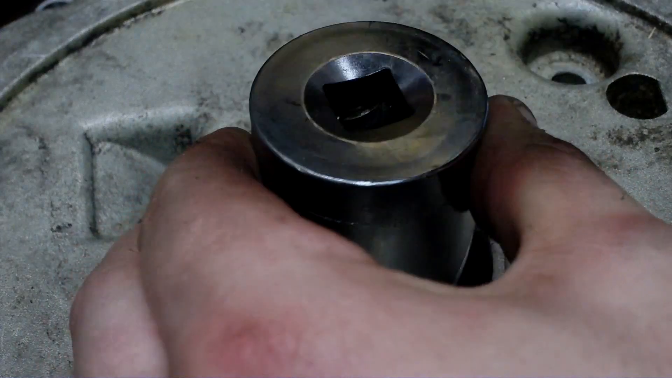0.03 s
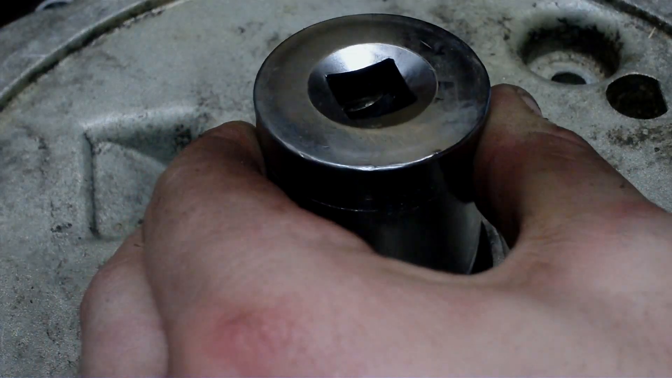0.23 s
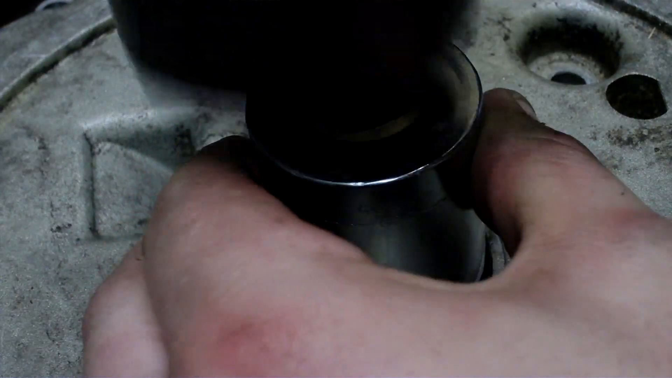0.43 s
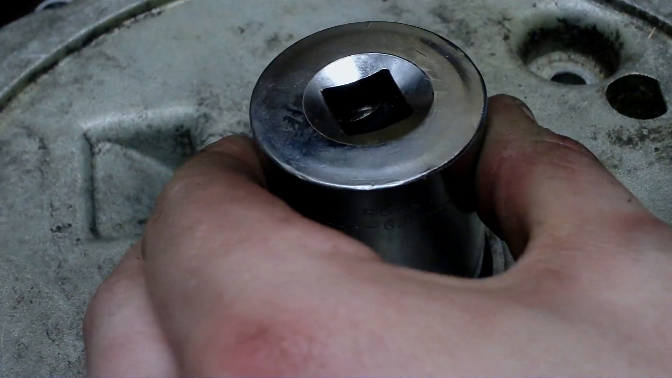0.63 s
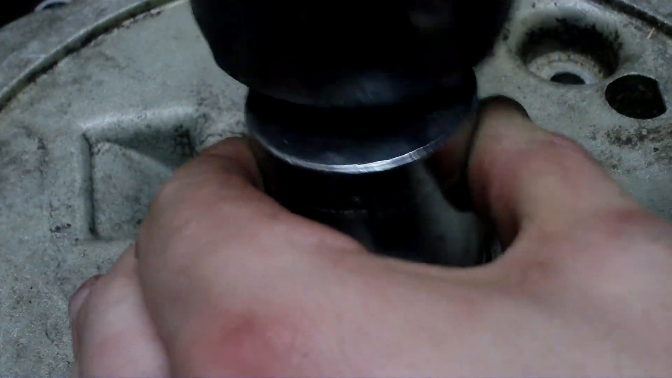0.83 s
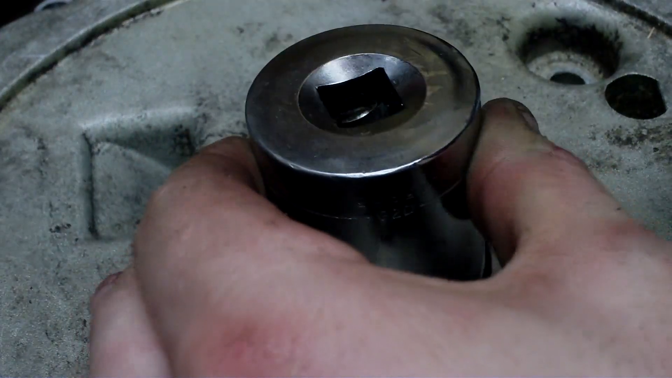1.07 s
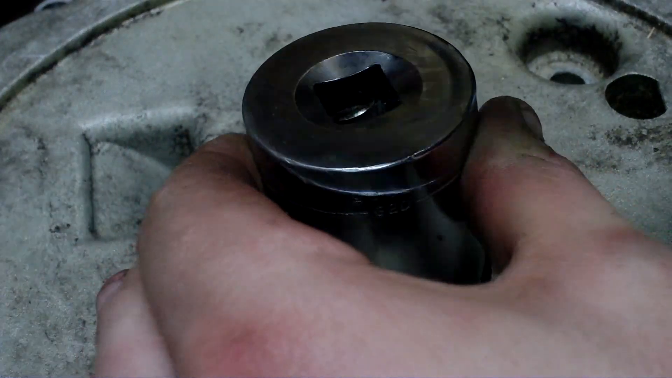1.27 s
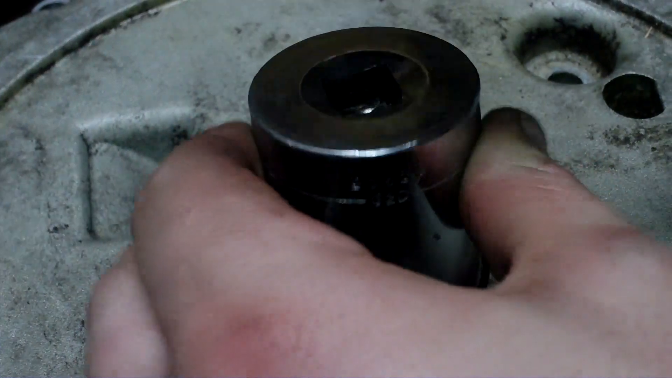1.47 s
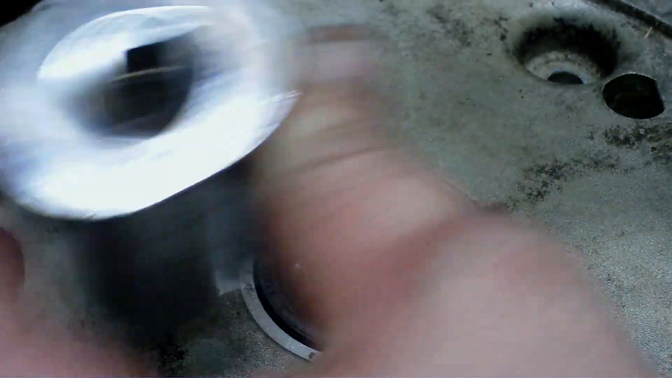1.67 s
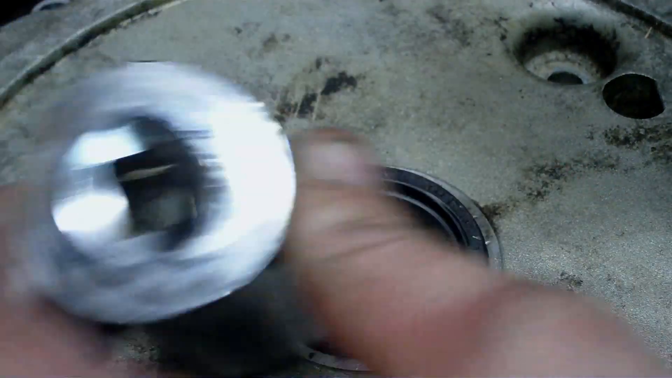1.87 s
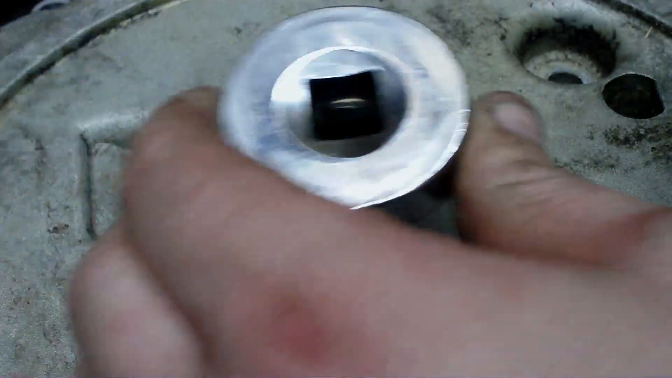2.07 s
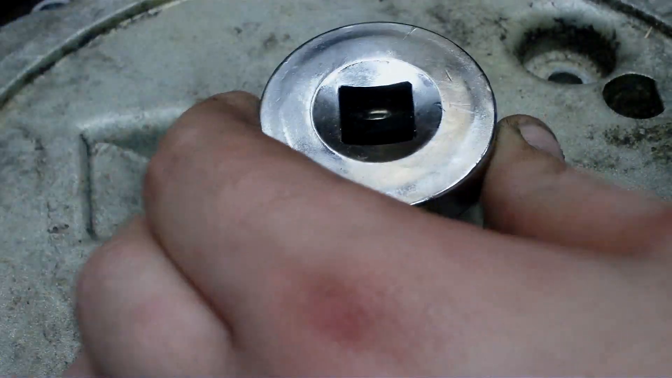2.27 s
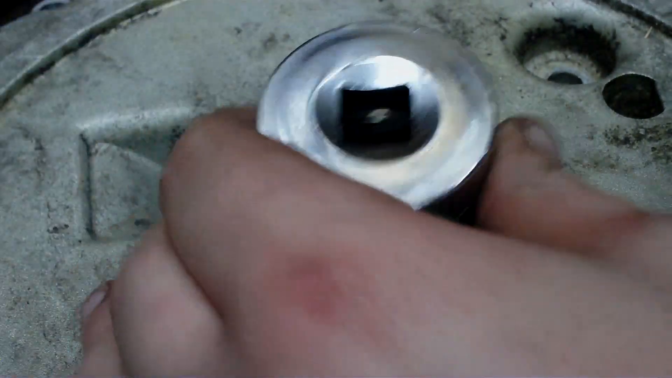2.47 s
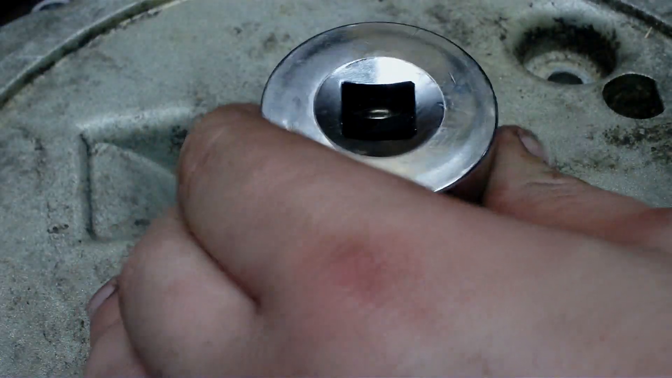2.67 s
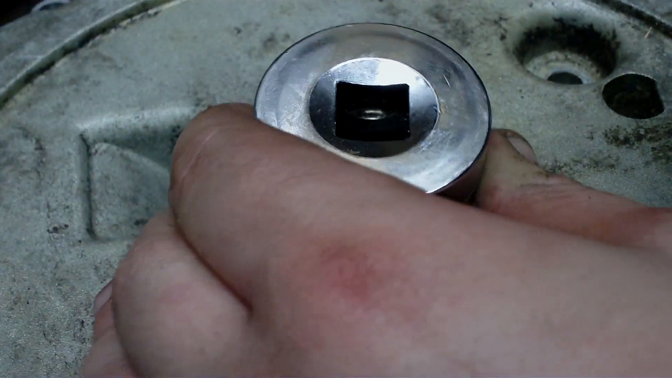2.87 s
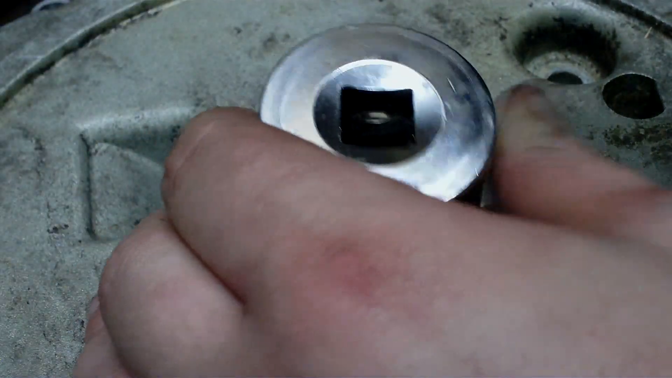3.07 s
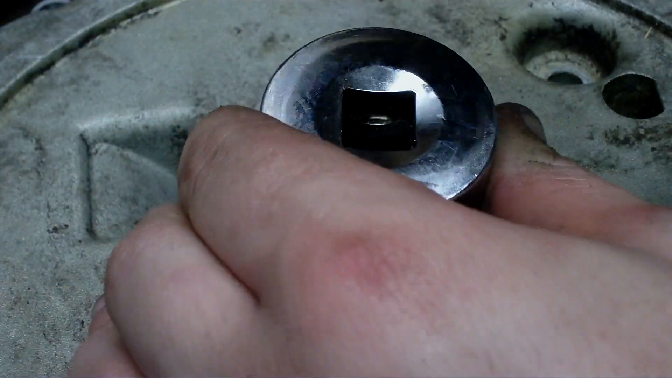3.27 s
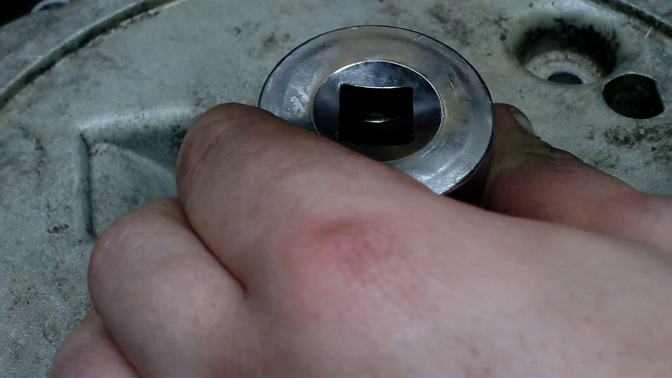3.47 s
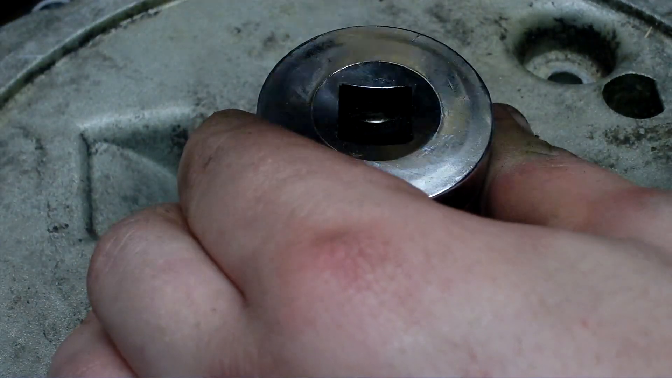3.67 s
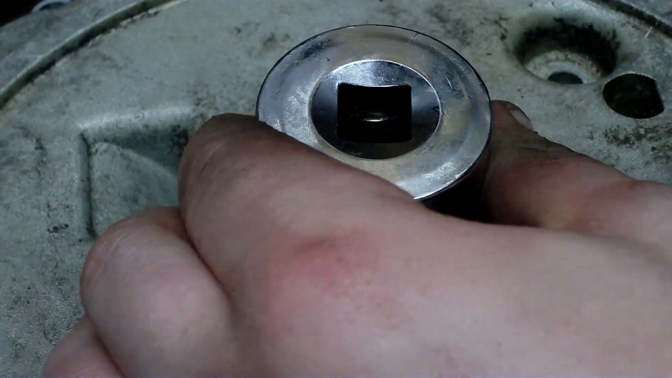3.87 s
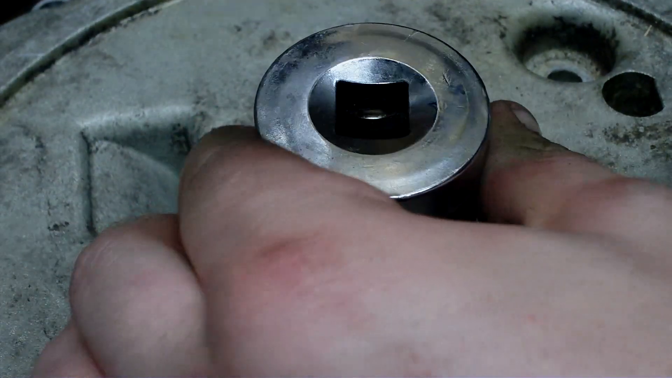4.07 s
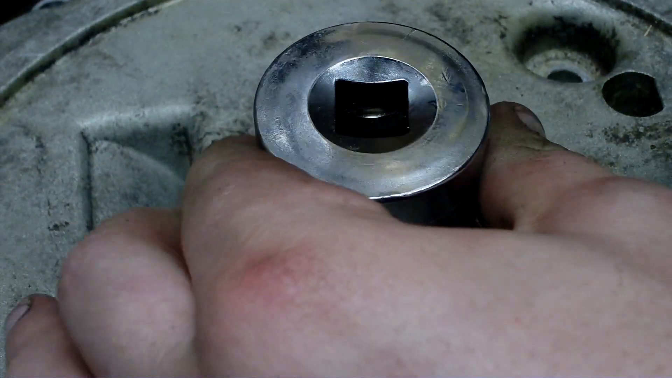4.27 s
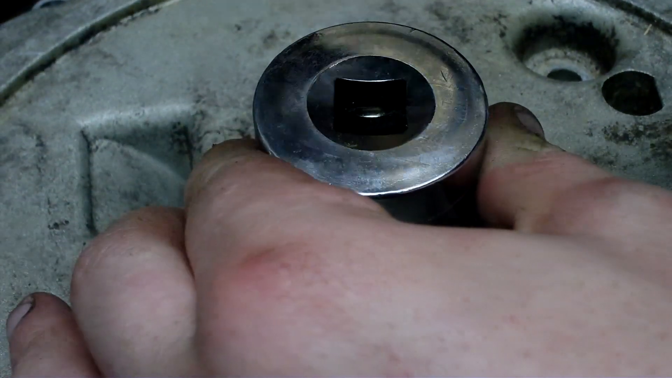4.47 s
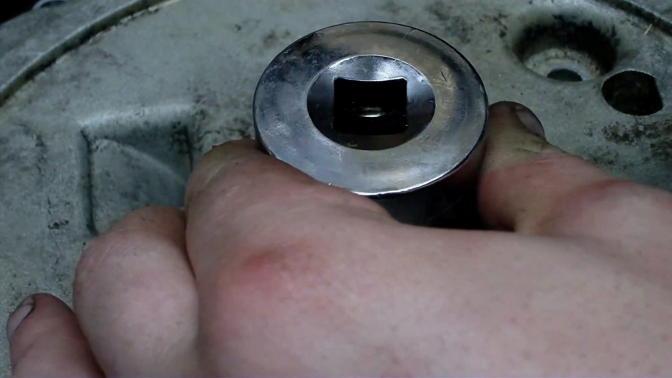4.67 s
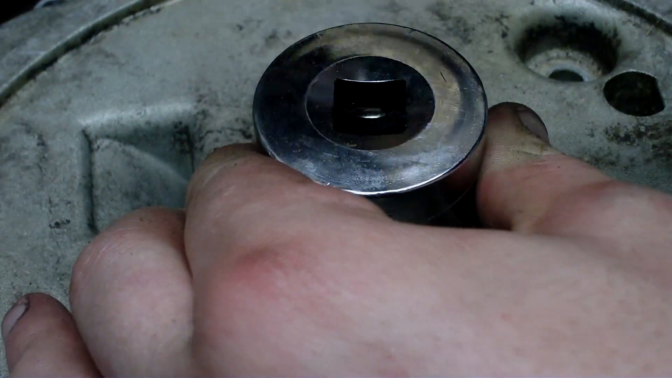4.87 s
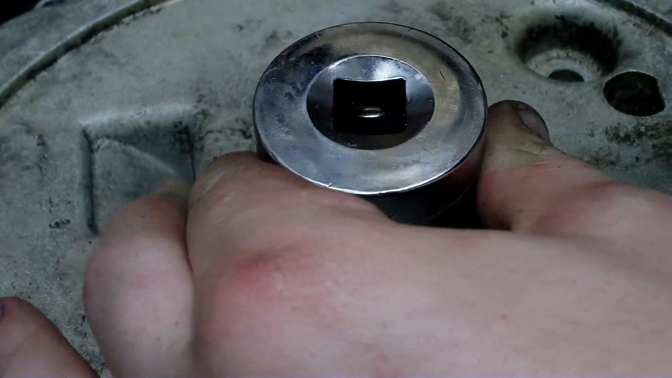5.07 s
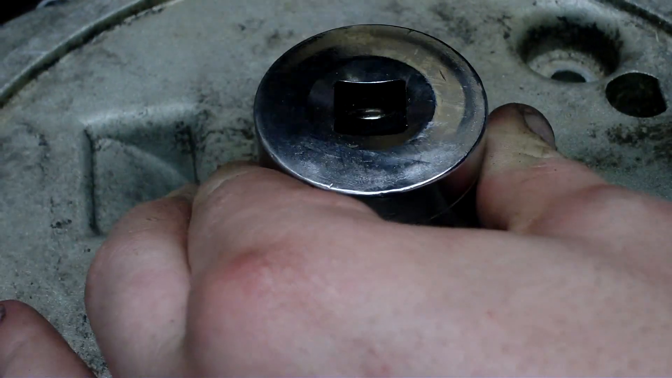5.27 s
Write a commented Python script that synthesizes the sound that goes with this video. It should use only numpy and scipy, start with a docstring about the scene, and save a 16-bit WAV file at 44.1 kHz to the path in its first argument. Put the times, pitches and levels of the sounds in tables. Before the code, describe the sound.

A rubber mallet drives a seal into a cast metal engine housing through a hand-held steel socket, heard close in a garage. A weaker blow is already sounding at 0 s, another lands at 0.47, then fuller ones at 0.96 and 1.46. Each is a blunt, hard crack with an almost immediate bounce, a short low thump, a dense midrange clang and a thinner, shimmering steel ring, fading within about 0.4 s. From 1.8 to 2.4 s skin rubs softly on the socket; a cushioned knock with a slight click falls at 2.3, a fainter touch at 2.9. Barely audible rising whistles chirp between 1.8 and 3.5. A light scuff at 3.66 leads to a moderate blow at 3.72, then heavy ones at 4.08, 4.49, 4.89 and a bright, thumpy one at 5.28, cut short. Peaks are compressed and overloaded, extreme treble missing; faint steady air lies beneath.

```python
"""A rubber mallet drives a seal into a cast engine housing through a hand-held steel socket, in a garage.
Each blow is a noise crack with a rebound, a low thump, decaying housing modes, beating socket modes and a wash.
Between blows come soft touches and a slide of skin on the socket (filtered noise), and faint rising sine chirps.
Quiet band-shaped air noise lies beneath. The sound is nearly mono below the treble;
a limiter and a rounded overload hold down the loud peaks, and a steep filter removes the very top."""
import sys
import numpy as np
from scipy import signal
from scipy.io import wavfile

SR = 44100
rng = np.random.default_rng(int(sys.argv[2]) if len(sys.argv) > 2 else 0)


def generate_wav(sig):
    """Save sig (samples, or channels by samples) to the path in sys.argv[1] as 16-bit PCM at SR."""
    pcm = np.round(np.clip(np.atleast_2d(sig).T, -1, 1) * 32767).astype(np.int16)
    wavfile.write(sys.argv[1], SR, pcm)


N = 234170

AGE = np.arange(SR * 4 // 5) / SR   # time since a contact [s]
EDGES = 22 * 2 ** (np.arange(28) / 3)   # third-octave band edges [Hz]
CENTRES = np.sqrt(EDGES[1:] * EDGES[:-1])


def from_db(db):
    """Decibels to gain."""
    return 10 ** (np.asarray(db) / 20)


def rms_one(x):
    """Scale to unit rms."""
    return x / np.sqrt(np.mean(x ** 2) + 1e-20)


def at_hz(points, hz):
    """Read a table on a log-frequency axis."""
    points = np.array(points)
    return np.interp(np.log(hz), np.log(points[:, 0]), points[:, 1])


def butter(x, hz, kind, order=2):
    """Causal Butterworth filter."""
    return signal.sosfilt(signal.butter(order, hz, kind, fs=SR, output="sos"), x)


def dying(t60):
    """Envelope that falls by 60 dB in t60 seconds."""
    return np.exp(-np.log(1000) * AGE / t60)


def add(out, s, sound):
    """Mix a sound in at time s, trimmed to the scene."""
    start = round(s * SR)
    first = max(start, 0)
    last = min(start + sound.shape[-1], N)
    out[:, first:last] += sound[..., first - start:last - start]


# stereo width of noise and socket ring: (frequency [Hz], side level relative to mid [dB])
STEREO_WIDTH = [(100, -53.5), (400, -53.5), (1000, -52), (2500, -41), (4500, -22), (7000, -5.5),
                (11000, 1.5)]


def noise_bands(spectrum, size):
    """Third-octave stereo noise (bands, 2, size), shaped to about unit mid power, wider in the treble."""
    gains = from_db(at_hz(spectrum, CENTRES))
    total_power = np.sum(gains ** 2 * np.diff(EDGES)) / (SR / 2)
    gains = gains / np.sqrt(total_power)
    white = rng.standard_normal((2, 2, size))
    bands = np.empty((len(CENTRES), 2, size))
    for k, hz in enumerate(CENTRES):
        # neighbouring bands draw on different noise
        mid, side = gains[k] * butter(white[k % 2], EDGES[k:k + 2], "band")
        bands[k] = mid + from_db(at_hz(STEREO_WIDTH, hz)) * side * [[1], [-1]]
    return bands


# decay of the dense ringing: (frequency [Hz], t60 [s])
WASH_DECAY = [(50, 0.13), (130, 0.37), (300, 0.4), (1000, 0.38), (1700, 0.38), (3000, 0.21), (6000, .29),
              (11000, .25)]
# a more firmly seated socket makes the housing's midrange ring more;
# bass and rebound grow less, the crack hardly at all
# each pair: level at housing ring 0 [dB], growth [dB per dB of housing ring]
CRACK_DB, CRACK_GROWTH = 1, 0.027
BASS_DB, BASS_GROWTH = -0.5, 0.33
REBOUND_DB, REBOUND_GROWTH = 0, 0.91
REBOUND_S = 0.021   # the socket hops and lands again
CRACK_LOW_HZ, CRACK_HIGH_HZ = 330, 7500   # the crack has no deep bass, and rubber softens its very top


def wash(bands, housing_ring_db, bright_db, crack_t60, build_s, contact_s):
    """Countless modes and reflections: a crack, a second as the socket lands, a tail that dies band by band."""
    out = np.zeros((2, len(AGE)))
    swell = 1 - np.exp(-AGE / build_s)
    contact = dying(crack_t60) * (1 - np.exp(-AGE / contact_s))
    landing = np.interp(AGE - REBOUND_S, AGE, contact)
    rebound = from_db(REBOUND_DB + REBOUND_GROWTH * housing_ring_db) * landing
    crack = np.hypot(from_db(CRACK_DB + CRACK_GROWTH * housing_ring_db) * contact, rebound)
    bass_lift_db = BASS_DB + BASS_GROWTH * housing_ring_db - housing_ring_db
    for hz, band in zip(CENTRES, bands):
        high = hz ** 2 / (hz ** 2 + 2200 ** 2)   # share of the brightness
        low = 1 / (1 + (hz / 450) ** 2)   # share of the bass lift
        tilt = from_db(bright_db * high + bass_lift_db * low)
        crack_colour = 1 / np.hypot(1, (CRACK_LOW_HZ / hz) ** 2) / np.hypot(1, hz / CRACK_HIGH_HZ)
        tail = from_db(housing_ring_db) * swell * dying(at_hz(WASH_DECAY, hz))
        out += tilt * np.hypot(crack_colour * crack, tail) * band
    return out


def struck(modes, scatter_db=0):
    """Decaying modes: each strike gives them random polarity and, with scatter, shares its energy anew."""
    out = np.zeros(len(AGE))
    for hz, db, t60 in modes:
        level_db = db + abs(scatter_db) * rng.standard_normal()
        strength = from_db(level_db) * rng.choice([-1, 1])
        out += strength * dying(t60) * np.sin(2 * np.pi * hz * AGE)
    return butter(out, 140, "high")   # small bodies radiate no deep bass


def shimmering(modes, flutter_hz, build_s, steady):
    """High modes arrive by many paths: they swell, then beat at random, differently on each side."""
    out = np.zeros((2, len(AGE)))
    for hz, db, t60 in modes:
        paths = rms_one(butter(rng.standard_normal((4, len(AGE))), flutter_hz, "low"))
        sine = np.sin(2 * np.pi * hz * AGE)
        cosine = np.cos(2 * np.pi * hz * AGE)
        mid = (steady + paths[0]) * sine + paths[1] * cosine
        side = from_db(at_hz(STEREO_WIDTH, hz)) * (paths[2] * sine + paths[3] * cosine)
        out += from_db(db) * dying(t60) * (mid + side * [[1], [-1]])
    return out * (1 - np.exp(-AGE / build_s))


def thump(hz, t60):
    """The rubber head shoves the whole housing away: a heavily damped low swing."""
    swing = np.sin(2 * np.pi * hz * AGE) * dying(t60)
    return -butter(swing, 30, "high", order=1)


# mallet blows: (time [s], housing ring [dB], brightness [dB], thump relative to housing ring [dB],
# freedom of the socket to ring, relative to housing ring [dB])
MALLET_BLOWS = [(-0.028, -12.5, -5.5, -17, -6), (0.4746, -10.5, 3.5, -10, -5.5),
                (0.962, -2, 3.5, -15.5, -0.5), (1.4552, -1, 3.5, -17.5, 4), (3.7170, -9, 2, -15.5, 0),
                (4.0775, 1, 1.5, 1.5, -3.5), (4.4890, 2, 4, -6, -4.5), (4.8880, 4.5, 3.5, -2, -7),
                (5.284, -2.5, 7, 6.5, 1)]
# strongest resonances of the cast housing: (frequency [Hz], relative level [dB], t60 [s])
HOUSING_MODES = [(170, -11, .36), (238, -8, .38), (291, -7, .33), (338, -2, .3), (373, -4, .28),
                 (396, 2, .33), (554, -7, .25), (658, -7, .28), (772, -1, .28), (822, -2, .26),
                 (839, 1, .3), (1093, -3, .28), (1140, -3, .26), (1227, -3, .28), (1287, -5, .28),
                 (1335, -3, .28), (1457, -3, .25), (1710, -7, .22), (1950, -10, .2), (2129, -12, .2),
                 (2572, -11, .2), (2867, -15, .2), (3200, -17, .15)]
# steel socket, damped by the hand: (frequency [Hz], relative level [dB], t60 [s])
SOCKET_MODES = [(4813, 1, .31), (6223, 0, .28), (6934, -15, .75), (7214, 1, .28), (7957, -1, .32),
                (7989, -1, .32), (9135, 6, .26), (9545, -2, .3), (10510, 2, .29)]
# dense ringing of housing and garage: (frequency [Hz], relative level per Hz [dB])
WASH_SPECTRUM = [(40, -22.5), (120, -16), (210, -14), (320, 0.5), (600, 0.5), (850, 2.5), (1400, -2),
                 (2000, -10), (2300, -13), (3000, -16.5), (5000, -26), (8000, -33.5), (11000, -45.5)]
LONG_RING_HZ, LONG_RING_T60 = 1082, 0.72   # [Hz], [s]: a lingering mode, louder when the grip is loose


def mallet(wash_db, housing_db, socket_db, long_db, thump_db, alike):
    """Every blow excites the same bodies, in shares set by how firmly the socket sits and how tight the grip is."""
    out = np.zeros((2, N))
    lasting = noise_bands(WASH_SPECTRUM, len(AGE))
    alike = np.clip(alike, 0, 1)
    for s, housing_ring_db, bright_db, shove_db, freedom_db in MALLET_BLOWS:
        # part of the room's answer repeats; the hand and the point of contact shift the rest
        fresh = noise_bands(WASH_SPECTRUM, len(AGE))
        bands = np.sqrt(alike) * lasting + np.sqrt(1 - alike) * fresh
        dense = wash(bands, housing_ring_db, bright_db, crack_t60=0.13, build_s=0.0055, contact_s=0.00088)
        housing = from_db(housing_db) * struck(HOUSING_MODES, scatter_db=2)
        socket = shimmering(SOCKET_MODES, flutter_hz=25, build_s=0.011, steady=0.9)
        bodies = housing + from_db(socket_db + freedom_db) * socket
        bodies += from_db(long_db + freedom_db) * struck([(LONG_RING_HZ, 0, LONG_RING_T60)])
        bodies += from_db(thump_db + shove_db) * thump(hz=60.4, t60=0.013)
        add(out, s, from_db(wash_db) * dense + from_db(housing_ring_db) * bodies)
    return out


# colour of the garage air: (frequency [Hz], relative level per Hz [dB])
AIR_SPECTRUM = [(18, -53), (30, -34.5), (231, -4), (369, -3.5), (428, 2), (484, -1.5), (521, 3),
                (1120, -1.5), (1540, -3), (2650, -8.5), (3070, -8.5), (3470, -11.5), (10800, -27),
                (14000, -49), (22000, -120)]
AIR_DB = -60.5


def garage_air():
    """Steady air of the garage: quiet noise summed from shaped bands."""
    return from_db(AIR_DB) * noise_bands(AIR_SPECTRUM, N).sum(axis=0)


# faint far chirps: (time [s], length [s], level [dB])
FAR_CHIRPS = [(1.778, 0.05, -65), (2.13, 0.17, -68.5), (2.45, 0.062, -68), (2.628, 0.17, -67.5),
              (3.12, 0.067, -70.5), (3.31, 0.15, -66.5)]
CHIRP_TOP_HZ, CHIRP_RISE_HZ_PER_S = 3300, 2700   # shared by all chirps
CHIRP_WAVER_HZ, CHIRP_WAVER_RATE_HZ = 40, 65   # random pitch waver: depth, and lowpass on its speed


def chirps():
    """Thin, slightly rough whistles, barely above the air, rising at one rate towards one top pitch."""
    out = np.zeros((2, N))
    for s, length, db in FAR_CHIRPS:
        left_s = np.linspace(length, 0, int(length * SR))
        waver = rms_one(butter(rng.standard_normal(len(AGE)), CHIRP_WAVER_RATE_HZ, "low"))[:len(left_s)]
        hz = CHIRP_TOP_HZ - CHIRP_RISE_HZ_PER_S * left_s + CHIRP_WAVER_HZ * waver
        whistle = np.sin(2 * np.pi * np.cumsum(hz) / SR)
        add(out, s, from_db(db) * np.sqrt(np.hanning(len(hz))) * whistle)
    return out


# resonances of the rub: (frequency [Hz], width [Hz], relative level [dB])
RUB_RESONANCES = [(554, 40, -3.5), (730, 26, -2), (1552, 58, -1.5), (1830, 120, -14)]
SLIDE_START_S, SLIDE_SWELL_S, SLIDE_STOP_S = 1.81, 0.14, 2.33   # the swell time also serves as the fade-out
SLIDE_DB, SLIDE_EASE_DB_PER_S = -58, 30   # level at the peak, then a steady fall


def slide():
    """Skin rubs on the socket: soft friction noise in a few resonances."""
    friction = rng.standard_normal(N)
    t = np.arange(N) / SR
    rub = np.zeros(N)
    for hz, width, db in RUB_RESONANCES:
        b, a = signal.iirpeak(hz, hz / width, fs=SR)
        rub += from_db(db) * signal.lfilter(b, a, friction)
    peak_s = SLIDE_START_S + SLIDE_SWELL_S
    end_s = SLIDE_STOP_S + SLIDE_SWELL_S
    contact = np.interp(t, [SLIDE_START_S, peak_s, SLIDE_STOP_S, end_s], [0, 1, 1, 0])
    level_db = SLIDE_DB - SLIDE_EASE_DB_PER_S * np.maximum(t - peak_s, 0)
    return contact * from_db(level_db) * rms_one(rub)


# light touches of socket and mallet: (time [s], scuff level [dB], dull above [Hz], scuff t60 [s],
# thud level [dB])
LIGHT_TOUCHES = [(2.2995, -50, 1700, 0.07, -41), (2.885, -51, 700, 0.12, -51), (3.656, -45, 1390, 1, -63.5),
                 (4.378, -49, 800, 0.52, -64)]
# housing, lightly touched: (frequency [Hz], relative level [dB], t60 [s])
THUD_MODES = [(186, -8, 0.094), (250, -9.5, 0.18), (336, -1.5, 0.078), (384, -15, .2), (945, -15.5, .2)]
# socket rim on the seal: (frequency [Hz], relative level [dB], t60 [s])
CLICK_MODES = [(2710, 4, 0.07), (3120, -9, .05)]
# the rim clicks with the thud, less when the touch is duller
CLICK_UNDER_THUD_DB, CLICK_DB_PER_OCTAVE, CLICK_HZ = 15, 6, 1500


def touches():
    """Soft contacts: a dull scuff, a cushioned thud from the housing and a click from the rim."""
    out = np.zeros((2, N))
    cushion = 1 - np.exp(-AGE / 0.001)
    for s, db, dull_hz, t60, thud_db in LIGHT_TOUCHES:
        scuff = butter(butter(rng.standard_normal(len(AGE)), dull_hz, "low"), 280, "high")
        scuff = from_db(db) * rms_one(scuff) * dying(t60)
        thud = from_db(thud_db) * struck(THUD_MODES)
        click_db = thud_db - CLICK_UNDER_THUD_DB + CLICK_DB_PER_OCTAVE * np.log2(dull_hz / CLICK_HZ)
        click = from_db(click_db) * struck(CLICK_MODES)
        add(out, s, butter(cushion * (scuff + thud), 150, "high") + click)
    return out


def scene():
    """Blows and handling over the quiet air of the garage."""
    blows = mallet(wash_db=-4, housing_db=-16.0, socket_db=-39, long_db=-24, thump_db=-2, alike=0.46)
    return blows + garage_air() + chirps() + slide() + touches()


def limiter(x, threshold_db, release_db_per_s, attack_s):
    """Gain drops quickly on peaks above the threshold and recovers at a steady rate."""
    peak_db = 20 * np.log10(np.abs(x).max(axis=0) + 1e-9)
    over = np.maximum(peak_db - threshold_db, 0)
    ramp = release_db_per_s * np.arange(N) / SR
    held = np.maximum.accumulate(over + ramp) - ramp   # peak hold that falls in a straight line
    pole = np.exp(-1 / (attack_s * SR))
    reduction_db = signal.lfilter([1 - pole], [1, -pole], held)
    return x * from_db(-reduction_db)


CUTOFF_HZ = 10850


def record(dry):
    """Overloaded microphone: limiter, rounded overload, and a steep cut of the top."""
    held = limiter(dry, threshold_db=3.5, release_db_per_s=152.0, attack_s=0.0016)
    clipped = held / (1 + held ** 8) ** (1 / 8)
    return signal.sosfilt(signal.ellip(10, 0.2, 70, CUTOFF_HZ, fs=SR, output="sos"), clipped)


dry = scene()
out = record(dry)
generate_wav(out)
```